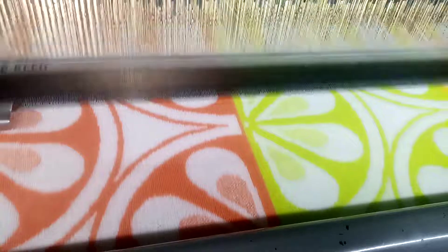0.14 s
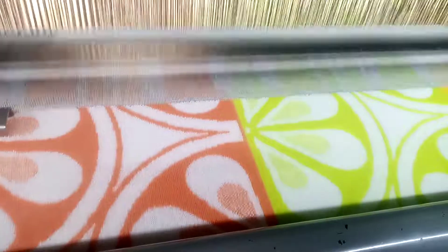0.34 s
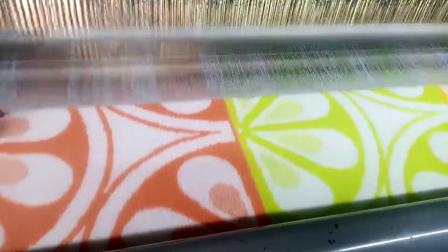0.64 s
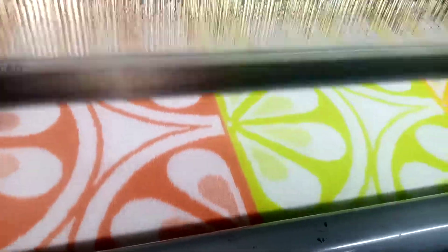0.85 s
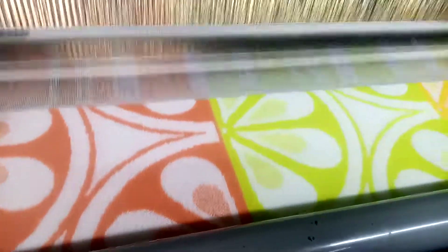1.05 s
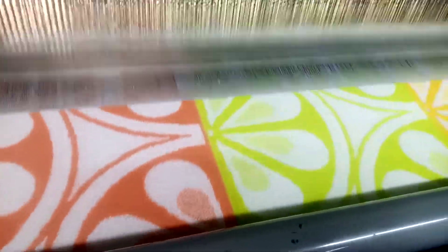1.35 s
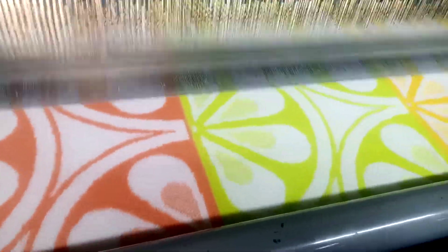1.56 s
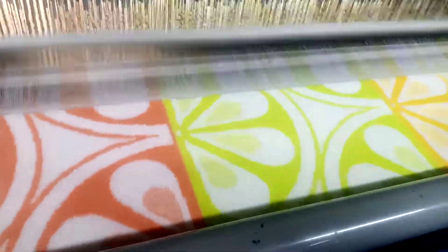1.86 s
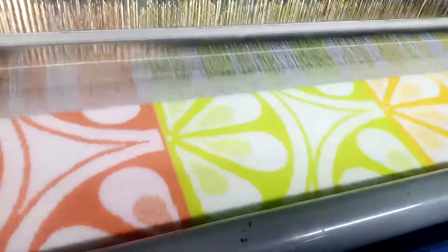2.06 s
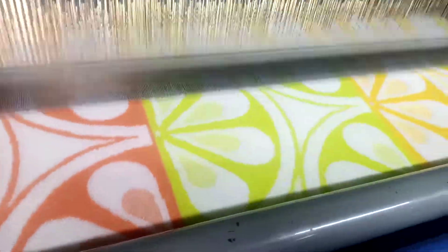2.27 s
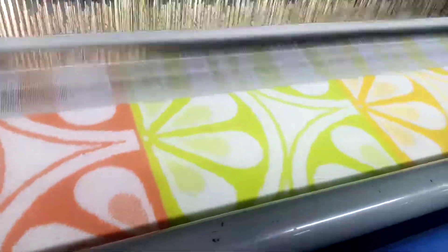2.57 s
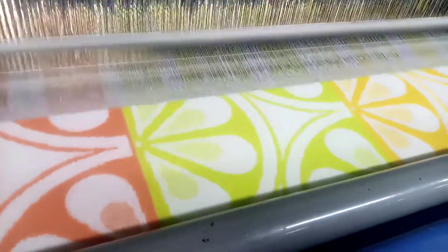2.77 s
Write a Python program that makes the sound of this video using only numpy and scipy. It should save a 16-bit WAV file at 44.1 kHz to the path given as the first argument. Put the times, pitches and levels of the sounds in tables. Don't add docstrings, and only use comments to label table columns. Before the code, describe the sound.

A power loom clatters at about eight beats a second, hissing air amid a factory roar

```python
import sys
import numpy as np
from scipy import signal
from scipy.fft import rfft, irfft
from scipy.io import wavfile
from scipy.ndimage import uniform_filter1d

SR = 44100
rng = np.random.default_rng(int(sys.argv[2]) if len(sys.argv) > 2 else 0)


def output_pcm(signal):
    pcm = np.clip(np.atleast_2d(signal).T, -1, 1) * 32767
    wavfile.write(sys.argv[1], SR, np.round(pcm).astype(np.int16))


def volts(x):
    e = np.asarray(x, float) / 20
    return 10 ** e


N = 128331
TIME_S = np.arange(N) / SR
PICK_S, FIRST_PICK_S, NEIGHBOUR_PICK_S = 0.11975, 0.0805, 0.125


def evened(x):
    return x / np.sqrt(np.mean(x ** 2) + 1e-20)


def colour(x, points):
    point_hz, point_db = np.transpose(points)
    hz = np.fft.rfftfreq(len(x), 1 / SR)
    gain_db = np.interp(np.log(hz + 1), np.log(point_hz + 1), point_db)
    return irfft(rfft(x) * volts(gain_db), len(x))


def hiss(points, patchy_db, flicker_db):
    frames = N // 128 + 5
    real, imag, patches = rng.standard_normal((frames, 257, 3)).T
    patches = uniform_filter1d(patches, size=8, axis=0)
    patches = evened(uniform_filter1d(patches, size=10, axis=1))
    flicker = evened(uniform_filter1d(rng.standard_normal(frames), size=2))
    z = (real + 1j * imag) * volts(patchy_db * patches + flicker_db * flicker)
    noise = signal.istft(z, nperseg=512, noverlap=384)[1][:N]
    return evened(colour(noise, points))


def valve(pick_s, first_s, opens_s, rise_s, open_s, release_s, level_db):
    since_s = (TIME_S - first_s - opens_s) % pick_s
    rise = np.minimum(since_s / rise_s, 1)
    release = np.exp(-np.maximum(since_s - open_s, 0) / release_s)
    return volts(level_db) * rise * release


def ring(modes):
    t = np.arange(3000) / SR
    sines = sum(volts(db - 60 * t / t60_s) * np.sin(2 * np.pi * hz * t) for hz, db, t60_s in modes)
    return sines * np.minimum(t / 0.00091, 1)


def struck(clicks, modes):
    return signal.oaconvolve(clicks, ring(modes))[:N]


def strikes(times_s, level_db):
    out = np.zeros(N)
    at = np.round(np.asarray(times_s) * SR).astype(int)
    gain = volts(level_db) * np.ones(len(at))
    np.add.at(out, at[at < N], gain[at < N])
    return out


def picks(delay_s, spread_db, jitter_s):
    late, loud = rng.standard_normal((24, 2)).T
    times_s = FIRST_PICK_S + delay_s + PICK_S * np.arange(24) + jitter_s * late
    return strikes(times_s, spread_db * loud)


# opens_s (after pick), rise_s, open_s, release_s, level_db
VALVES = [
    (0.0024, 0.0086, .029, 0.0092, 0.8),
    (-0.0047, 0.008, 0.073, 0.012, -3),
    (0.101, .004, 0.0088, 0.0066, -10),
]
# freq_hz, level_db (per Hz)
MAIN_JET = [(2000, -10), (3600, -5.5), (5000, -10.5), (6300, -3), (9000, -12), (11500, -3.5), (16000, -4)]
RELAY_JET = [(1500, -25), (3500, -12), (5000, -4), (9000, -1.2), (12000, -4), (16000, -3)]
STRETCH_JET = [(1500, -12), (3000, -11), (6000, 3), (9000, 3), (12000, -20), (16000, -8)]


def nozzles():
    jets = zip(VALVES, (MAIN_JET, RELAY_JET, STRETCH_JET))
    blasts = sum(valve(PICK_S, FIRST_PICK_S, *timing) * hiss(jet, patchy_db=0, flicker_db=0.7)
                 for timing, jet in jets)
    return volts(-24) * blasts


# start_s, peak_db
BEATS = [(0.282, -21), (0.3996, -15), (0.519, -12.5), (0.6389, -22), (0.7598, -14), (0.879, -17),
         (0.9975, -16), (1.1183, -13), (1.2367, -14), (1.3588, -15), (1.476, -14), (1.5963, -15),
         (1.717, -13.5), (1.8373, -15.5), (1.9556, -15), (2.075, -15), (2.1944, -9), (2.3164, -21),
         (2.4357, -12.5), (2.5541, -19), (2.6748, -17), (2.7948, -20)]
# pitch_hz, level_db, t60_s
REED_MODES = [(1150, -6, .016), (1290, 0.1, .022), (1480, -2, .02), (1700, -10, .012)]
# pitch_hz, level_db, t60_s
PILE_MODES = [(3555, -1, 0.01), (3750, -5.5, 0.034), (3360, -2, 0.022)]


def reed():
    start_s, peak_db = np.transpose(BEATS)
    knock = np.zeros(N)
    for mode in REED_MODES:
        chance = rng.standard_normal(len(start_s))
        clicks = strikes(start_s + 0.00032 * abs(chance), peak_db - 3.5 + 0.74 * chance)
        knock += struck(clicks, [mode])
    pile_s = FIRST_PICK_S + 0.0825 + 3 * PICK_S * np.arange(8)
    pile = strikes(pile_s, -22.5 + 1.6 * rng.standard_normal(8))
    return knock + struck(pile, PILE_MODES)


# pitch_hz, width_hz, level_db
FRAME_MODES = [(123, 12.6, 1.5), (169, 31, -8), (249.6, 10.4, 4.5), (282, 40, -2.5), (351, 86, -9),
               (420, 20, -5.5), (535, 96, -10), (822, 80, -15)]


def frame():
    one_pick = rng.standard_normal(round(PICK_S * SR))
    shake = evened(signal.oaconvolve(picks(0, 1.1, 0.0001), one_pick)[:N])
    shake = shake + 0.41 * rng.standard_normal(N)
    hz = np.fft.rfftfreq(N, 1 / SR)
    body = sum(volts(db) / (1 + 2j * (hz - mode_hz) / width_hz) for mode_hz, width_hz, db in FRAME_MODES)
    return volts(-33) * evened(irfft(rfft(shake) * body, N))


# delay_s (after pick), pitch_hz, width_s, level_db
THUMPS = [
    (.0388, 244, .0018, -22.5),
    (0.01224, 252, .003, -26.5),
    (.087, 110, 0.0058, -33.5),
    (.118, 87, 0.0014, -21),
]


def thumps():
    t = np.arange(-1000, 1001) / SR
    out = np.zeros(N)
    for delay_s, pitch_hz, width_s, level_db in THUMPS:
        burst = np.cos(2 * np.pi * pitch_hz * t) * np.exp(-0.5 * (t / width_s) ** 2)
        out += signal.oaconvolve(picks(delay_s, 1.8, 0.00025), volts(level_db) * burst, "same")
    return out


# pitch_hz, level_db, t60_s
SHAFT_MODES = [(604, -3, 0.027), (834, -1.1, 0.048), (1025, 5, 0.018), (1633, -4.5, 0.038),
               (2272, 2, 0.019), (2890, -17, 0.02), (3530, 0.5, 0.0092)]


def shafts():
    delay_s, spread_s, peak_per_s = 0.1, 0.014, 1500
    from_peak_s = (TIME_S - FIRST_PICK_S - delay_s + PICK_S / 2) % PICK_S - PICK_S / 2
    rate_per_s = peak_per_s * (0.12 + np.exp(-0.5 * (from_peak_s / spread_s) ** 2))
    size = volts(3.4 * np.minimum(rng.exponential(1, N), 2.5)) * rng.choice([-1, 1], N)
    hits = size * (rng.random(N) < rate_per_s / SR)
    which = rng.integers(0, len(SHAFT_MODES), N)
    rattle = sum(struck(hits * (which == k), [mode]) for k, mode in enumerate(SHAFT_MODES))
    return volts(-36.5) * evened(rattle)


# pitch_hz, level_db, t60_s
CUTTER_MODES = [(8500, -4.5, .03), (7200, -4, 0.022), (3500, 7, 0.011), (2510, 5, 0.014)]


def cutter():
    return volts(-26) * struck(picks(0.106, 1.2, 0.00091), CUTTER_MODES)


def hall(x):
    t60_s, gap_s = 0.27, 0.006
    t = np.arange(SR // 2) / SR
    echoes = rng.choice([-1., 1.], len(t)) * (rng.random(len(t)) < 0.05)
    tail = echoes * volts(-60 * t / t60_s) * (t > gap_s)
    return x + volts(-5.5) * signal.oaconvolve(x, tail / np.linalg.norm(tail))[:N]


# opens_s, rise_s, open_s, release_s, level_db
NEIGHBOUR_VALVE = (-0.0094, 0.0037, 0.029, 0.031, 0.1)
# freq_hz, level_db (per Hz)
NEIGHBOUR_JET = [(3000, -29), (8000, -1), (12500, -13), (14500, 2), (16000, -7)]
# time_s, neighbour_db, hall_hiss_db
WALK = [(0.1, -0.5, 0), (1.0, -0.5, 0.1), (1.9, -1.7, -0.1), (2.9, -0.5, 0.1)]


def neighbour():
    time_s, neighbour_db, _ = np.transpose(WALK)
    level = volts(-27.5 + np.interp(TIME_S, time_s, neighbour_db))
    flow = valve(NEIGHBOUR_PICK_S, 0, *NEIGHBOUR_VALVE)
    return level * flow * hiss(NEIGHBOUR_JET, patchy_db=0, flicker_db=1.5)


# freq_hz, level_db (per Hz)
LEAK = [(2000, -23.5), (4000, 0.5), (8000, -1), (12000, -3), (16000, -3.5)]


def leak():
    time_s, _, hall_hiss_db = np.transpose(WALK)
    level = volts(-28.5 + np.interp(TIME_S, time_s, hall_hiss_db))
    return level * hiss(LEAK, patchy_db=0.25, flicker_db=0.3)


# freq_hz, level_db (per Hz)
ROAR = [(15, -55), (25, -32), (87, -4.5), (236, -1), (430, -5), (494, -8.5), (724, -8), (816, -7.5),
        (3000, -13.5), (3900, -19), (6600, -120)]
# time_s, roar_db
SURGE = [(.1, .3), (.35, -.3), (.55, -.8), (.85, 1.2), (1.1, -.3), (1.3, .8), (1.55, .3), (1.8, -1.2),
         (2.1, 1.1), (2.35, -.4), (2.6, .3), (2.9, .2)]


def roar():
    floor_db = ROAR[-1][1]
    spectrum = ROAR[:-1] + [(2800, floor_db), (9000, floor_db - 14)]
    level = volts(-25 + np.interp(TIME_S, *np.transpose(SURGE)))
    return level * hiss(spectrum, patchy_db=1.0, flicker_db=0.9)


def scene():
    knocks = hall(reed() + shafts() + cutter())
    mono = nozzles() + knocks + frame() + thumps() + neighbour() + leak() + roar()
    return np.array([mono, mono])


def dropouts(x):
    per_s, low_hz, high_hz = 8, 9000, 11700
    hz, t, z = signal.stft(x, SR, nperseg=1024)
    for place, when, length in rng.random((round(per_s * N / SR), 3)):
        centre_hz = low_hz + place * (high_hz - low_hz)
        in_band = abs(hz - centre_hz) < 340
        in_time = abs(t - when * N / SR) < 0.012 + 0.008 * length
        z[np.ix_(in_band, in_time)] *= 0.05
    return signal.istft(z, SR, nperseg=1024)[1][:N]


def low_pass(x):
    return signal.sosfilt(signal.butter(12, 17100, fs=SR, output="sos"), x)


# freq_hz, gain_db
PORT = [(2800, -0.51), (4500, 3.5), (6450, 5.5), (7000, -1), (8200, -11.5), (9500, -13.5), (13900, -5),
        (14650, 8)]
# time_s, gain_db
FADE = [(.114, -22), (.122, -18.5), (.15, -15), (.165, -8), (.19, -7.5), (.22, -5.5), (.3, -2.5),
        (.36, 0.5), (.45, 1.2)]


def record(dry):
    low_cut_hz, limit, start_s, edge_hz = 59, 0.74, 0.1146, 15760
    low_cut = signal.butter(3, low_cut_hz, "high", fs=SR, output="sos")
    mono = signal.sosfilt(low_cut, colour(dry[0], PORT))
    mono = dropouts(limit * np.tanh(mono / limit))
    mono = mono * volts(np.interp(TIME_S, *np.transpose(FADE))) * (TIME_S > start_s)
    band_edge = signal.firwin(1023, edge_hz, window=("kaiser", 9), fs=SR)
    mono = signal.oaconvolve(mono, band_edge, "same")
    return low_pass(np.array([mono, mono]))


dry = scene()
out = record(dry)
output_pcm(out)
```